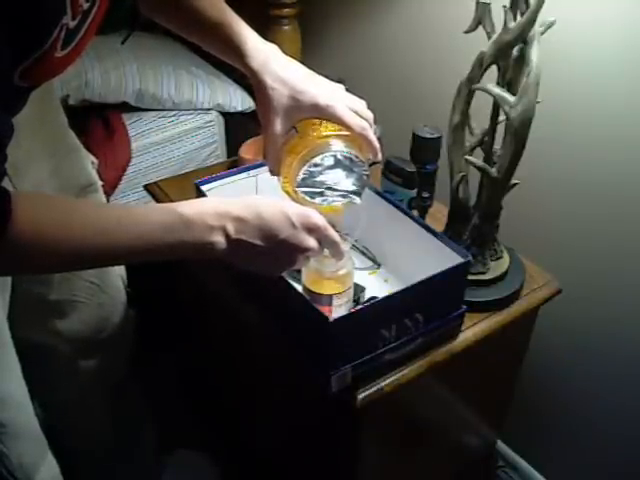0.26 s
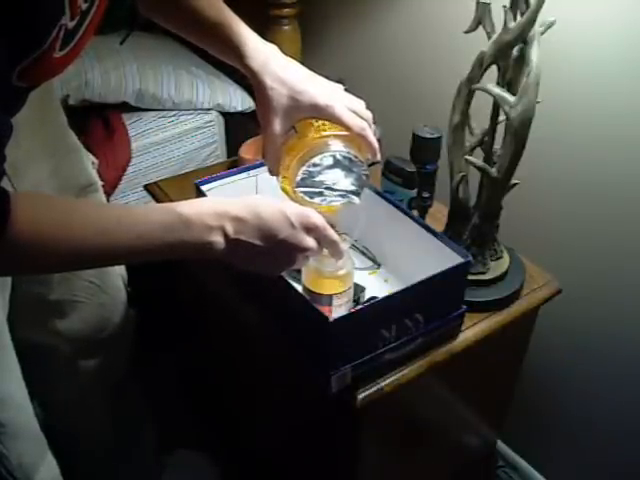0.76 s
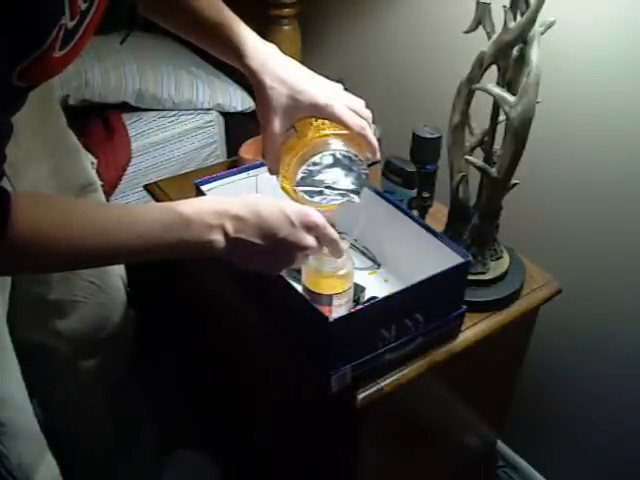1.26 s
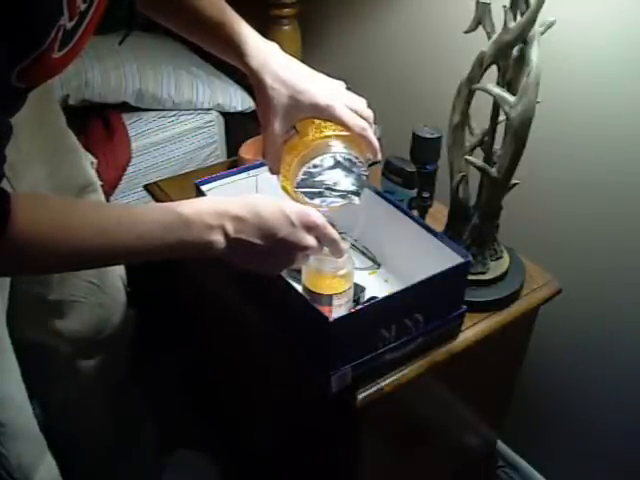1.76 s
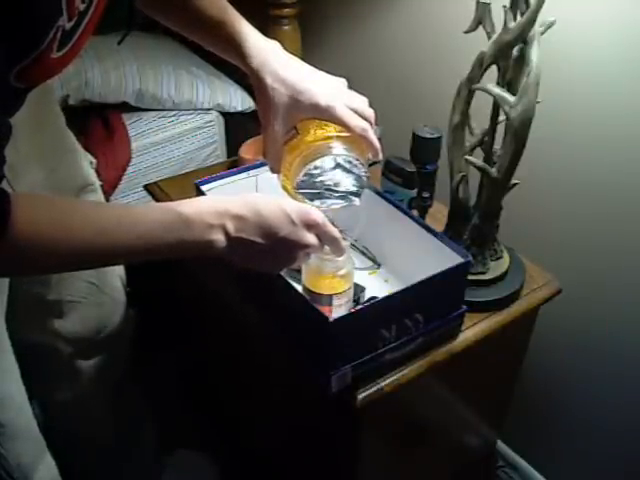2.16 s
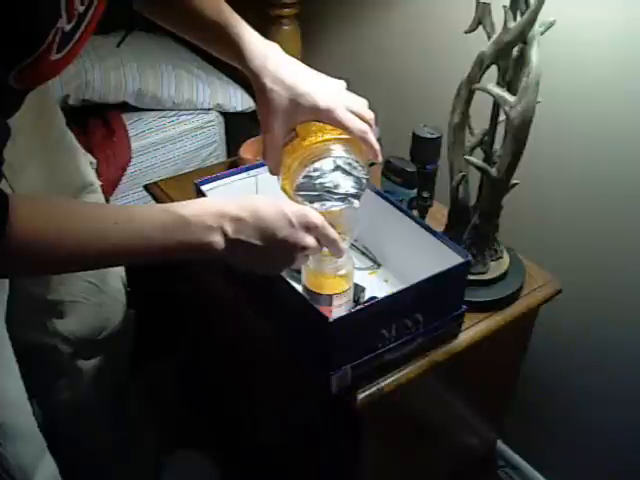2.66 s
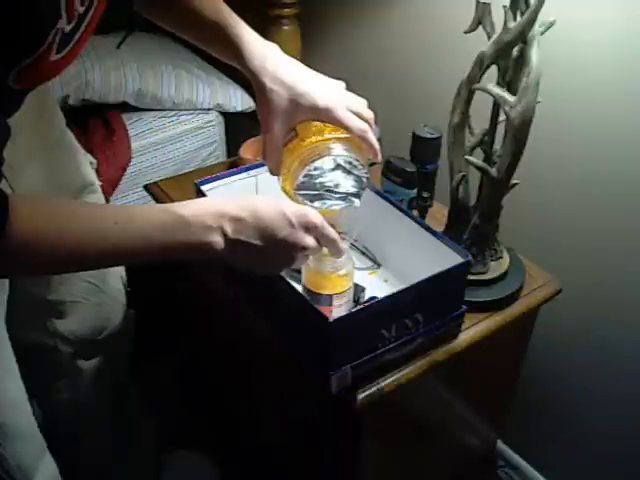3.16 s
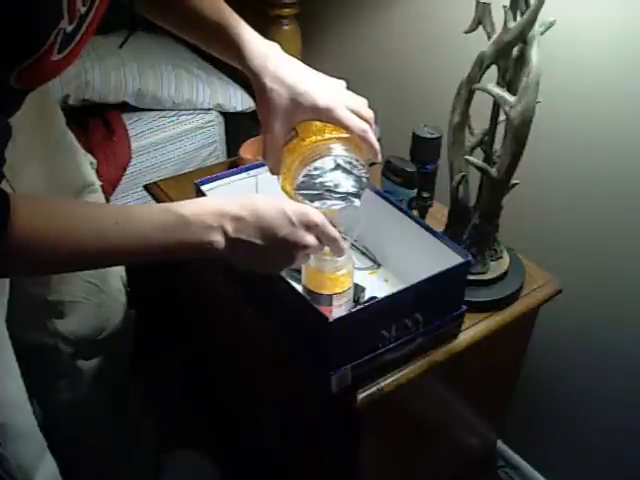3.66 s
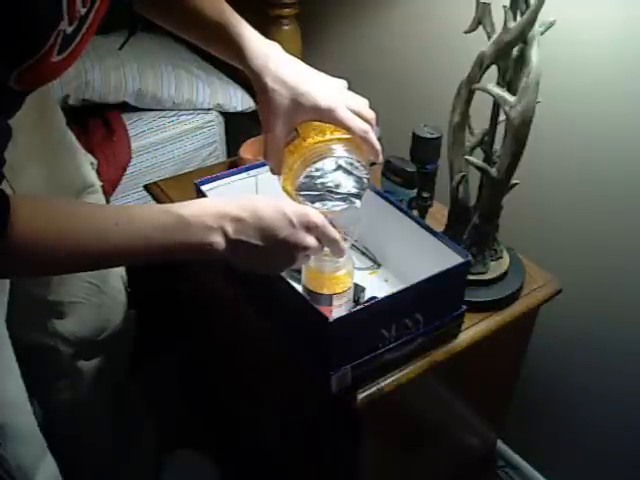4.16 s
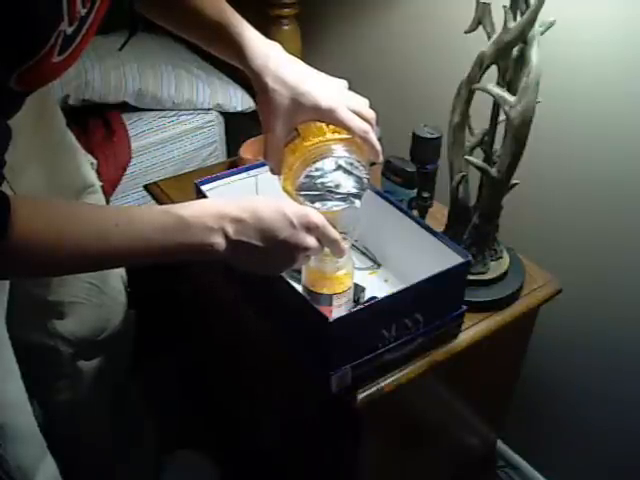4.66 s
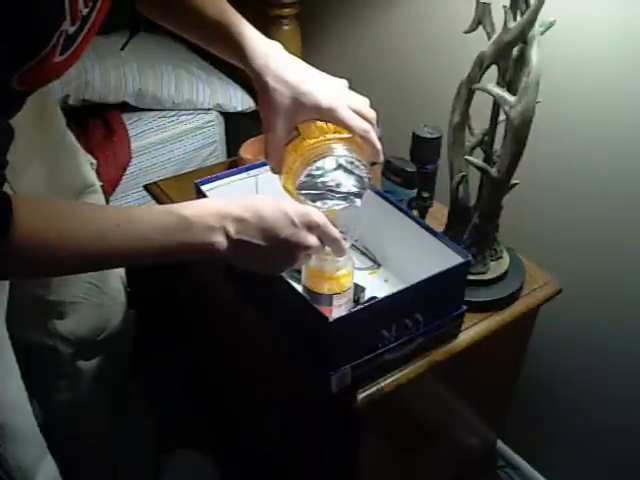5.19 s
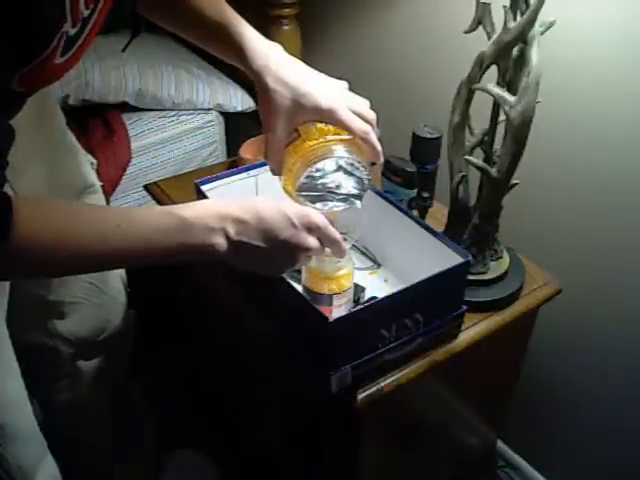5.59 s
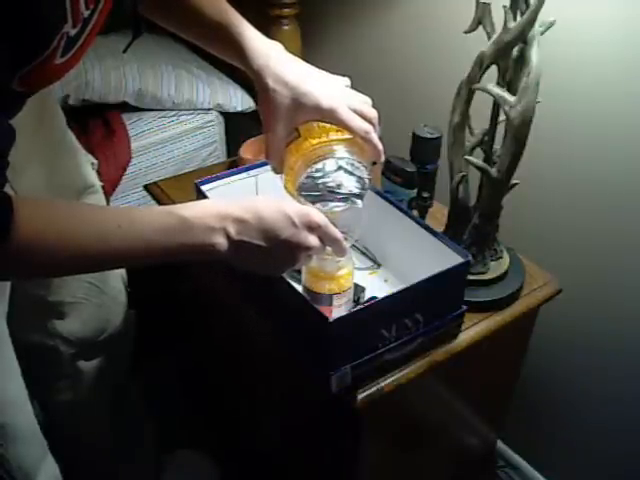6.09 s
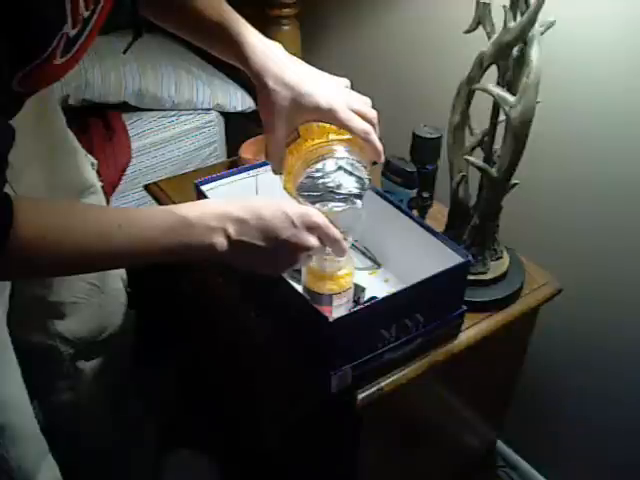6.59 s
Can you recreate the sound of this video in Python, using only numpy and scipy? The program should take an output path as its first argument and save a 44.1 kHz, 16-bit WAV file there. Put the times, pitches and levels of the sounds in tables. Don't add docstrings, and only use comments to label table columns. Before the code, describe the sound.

Small hard plastic pellets pour from a jar through a funnel into a little bottle, making a dense, bright rattle of sharp ticks. After about a second and a half the stream thins to scattered clicks and a soft slide, then floods back loudly and runs unevenly with hard knocks. Quiet, furnished room; cheap pocket camera close by, distorted, thin and gritty.

```python
import sys
import numpy as np
from scipy import signal
from scipy.fft import rfft, irfft
from scipy.io import wavfile
from scipy.ndimage import map_coordinates

SR = 44100
rng = np.random.default_rng(int(sys.argv[2]) if len(sys.argv) > 2 else 0)


def to_wav(s):
    ch = np.atleast_2d(s).T
    pcm = np.round(np.clip(ch, -1, 1) * 32767)
    wavfile.write(sys.argv[1], SR, pcm.astype(np.int16))


def volts_from_decibels(level):
    exponent = np.asarray(level, float) / 20
    return 10 ** exponent


N = 301203

# frequency_hz, bandwidth_hz, level_db
JAR_MODES = [(3280, 150, -2), (3610, 270, -3.5), (2630, 620, -4), (1980, 270, -9.5), (800, 180, -12)]
# start_s, peak_db, bottle_over_funnel_db
TRICKLE_HITS = [(1.6615, -7, -24), (1.685, -7.5, -8), (1.724, -9, -10), (1.7418, -13, -8),
                (1.7643, -17, -22), (1.7931, -2, -11.5), (1.8246, -3.5, -11), (1.8568, -3, -15),
                (1.8637, -7.5, -18), (1.8929, -7, -15), (1.953, -11.5, -10), (1.9817, -14.5, -3.5),
                (2.06, -25, -12), (2.1021, -26, -17), (2.1303, -15.5, -20), (2.1444, -16, -23),
                (2.1635, -16, -19), (2.228, -14, -21), (2.2358, -14, -17), (2.271, -22, -15),
                (2.3196, -9, -21), (2.3287, -3, -15), (2.358, -5, -9.5), (2.376, -13, -16),
                (2.3903, 7.5, -13.5), (2.4223, -19, -19)]
TRICKLE_START_S = TRICKLE_HITS[0][0]
SLIDE_START_S, SLIDE_END_S = 2.03, 2.31


def stream():
    s, size, touch = shower(count=10000, scatter_db=2.5, clump_db=-0.66, clump_hz=60.36)
    rattle = pellets(s, size, -8, touch)
    return volts_from_decibels(flow_db(np.arange(N) / SR)) * rattle / rattle.std()


def knocks():
    s, peak_db, wall_db = knock_rows()
    chance = rng.random((len(s), 5, 21))
    mean_gap_s = [.0002, .0009, .0013, .002, .003]
    delay_s = np.cumsum((.3 + chance[:, :, 0]) * mean_gap_s, axis=1)
    share_db = np.array([-8, -5, -8, -13.5, -15])
    flowing = (s < TRICKLE_START_S) | (s > SLIDE_END_S)
    builds = ((chance[:, 0, 0] < .5) & flowing)[:, None]
    size = volts_from_decibels(peak_db[:, None] + np.where(builds, np.roll(share_db, 2), share_db)).ravel()
    polarity = np.sign(chance[:, :, 1:11] - .5)
    touch = (polarity * (0.48 + 0.85 * chance[:, :, 11:])).reshape(-1, 10)
    s = (s[:, None] + delay_s).ravel()
    in_jar = (s > SLIDE_START_S) & (s < SLIDE_END_S)
    poured = pellets(s, size * ~in_jar, np.repeat(wall_db, 5) + 5, touch)
    return poured + ring(s, size * in_jar, JAR_MODES, touch)


def knock_rows():
    # start_s, peak_db, bottle_over_funnel_db
    first_pour = [(0.0162, -1.5, -8), (0.0951, 7.5, -15), (0.16, 3.5, -18), (0.1805, 2.5, -13),
                  (0.2575, 4, -13), (0.3008, 1, -4.5), (0.331, -7, -18), (0.3504, 2.5, -8.5),
                  (0.3801, 3, -26), (0.4, 4, -25), (0.4659, 2.5, -26), (0.5048, -5, -7), (0.5538, 5.5, -8),
                  (0.5787, -3, -16), (0.6047, 4, -15), (0.6577, 6.5, -10), (0.7226, 1, -14),
                  (0.825, 6, -31), (0.8455, 4.5, -25), (0.9133, 0, -26), (0.9615, 1, -23), (1.05, -1, -20),
                  (1.0885, 6, -17), (1.1766, 6.5, -26), (1.2132, -6, -9), (1.2525, 3.5, -11),
                  (1.3695, -11, -21), (1.3906, 0.5, -15), (1.4212, -8.5, -8), (1.574, -5.5, -17)]
    flood_hits = [(2.4418, -7, -25), (2.467, 1, -12), (2.5127, 5.5, -13), (2.5446, -4.5, -9),
                  (2.5864, 4.5, -11.5), (2.6755, 2, -19), (2.7148, 2, -21), (2.8743, 4, -14),
                  (2.9237, 3.5, -18), (3.0351, 1, -13), (3.0728, -3, -10), (3.1582, 2, -26)]
    uneven_hits = [(3.263, 3, -24), (3.3375, 4, -20), (3.4012, 1.5, -14), (3.432, -1, -11), (3.468, 5, -17),
                   (3.5316, 3.5, -16.5), (3.551, -20, -19), (3.6278, -1.5, -22), (3.6787, 4.5, -17),
                   (3.7178, 4, -17), (3.7912, 2, -26), (3.866, -0.5, -17), (3.9012, -3, -21),
                   (3.9243, 1.5, -19), (3.999, -9, -21), (4.0262, 6.5, -17), (4.0614, 0.5, -33),
                   (4.1801, 3, -32), (4.2953, 5, -19), (4.3406, 4, -15), (4.3927, 1, -9.5),
                   (4.4178, 9, -21), (4.4685, 9, -29), (4.5118, 10, -18), (4.5429, 7, -14),
                   (4.5798, 3, -19), (4.6119, 5, -28), (4.688, -5, -8), (4.7573, 0, -6.5), (4.9077, 2, -22)]
    last_shakes = [(5.1231, 0, -18), (5.3979, 3.5, -29), (5.4171, 2, -19), (5.433, 6, -14.5),
                   (5.4758, 4.5, -12), (5.5372, 3, -25), (5.5675, 1, -18), (5.6266, 0.5, -15),
                   (5.69, 6.5, -22), (5.7357, 2, -19), (5.815, -2, -29), (5.8421, -4, -10),
                   (5.8686, 6, -20), (5.903, -8.5, -23), (5.9177, 3, -15), (5.9528, -2.5, -8.5),
                   (6.0426, 5.5, -14.5), (6.0646, -4, -11), (6.0997, 1, -27), (6.1199, 1.5, -27),
                   (6.202, -12, -10), (6.2258, 8, -15), (6.325, 2, -14), (6.3477, 6.5, -12),
                   (6.3758, -3, -18), (6.4103, 13.5, -23), (6.4434, 3, -12), (6.682, 1, -25),
                   (6.78, 4, -19), (6.8085, 4.5, -16)]
    hard = np.vstack([first_pour, TRICKLE_HITS, flood_hits, uneven_hits, last_shakes])
    hard = hard + [0, 2.5, 0]
    chance = rng.standard_normal((400, 3)).T
    s = np.cumsum(.019 * np.exp(.45 * chance[0]))
    over_flow_db = 14.5 + 2.5 * np.minimum(chance[1], 1.2)
    wall_db = -18 + 6.5 * chance[2]
    rows = np.c_[s, flow_db(s) + over_flow_db, wall_db]
    crowded = np.abs(s[:, None] - hard[:, 0]).min(axis=1) < .012
    paused = (s > TRICKLE_START_S) & (s < SLIDE_END_S)
    rows[crowded | (s > N / SR) | paused, 1] = -99
    return np.vstack([hard, rows]).T


def flow_db(s):
    # time_s, rattle_db
    flow = [(0, -14.5), (.3, -11.5), (.9, -12.5), (1.3, -15.5), (1.7, -24), (1.9, -29.5), (1.93, -45.5),
            (2.3, -36.5), (2.41, -11), (2.75, -9), (3.4, -15), (4.27, -17.5), (4.5, -10.5), (5.04, -15),
            (5.45, -17.5), (5.95, -20), (6.4, -17), (6.83, -11.5)]
    # middle_s, length_s, change_db
    chokes = [(0.449, 0.0083, -12), (0.565, 0.021, -12), (1.002, 0.028, -6.5), (1.22, 0.021, -3.5),
              (1.49, 0.012, -2), (3.508, 0.035, -8), (3.856, .03, -4.5), (4.217, 0.056, -4),
              (5.08, 0.053, -5.5), (5.654, 0.018, -5), (5.79, 0.062, -2), (5.887, .03, -12),
              (5.935, 0.026, -9), (5.981, 0.011, 8), (6.037, .04, -9), (6.179, 0.0091, 9),
              (5.135, 0.035, 6.5), (5.439, 0.0082, 1), (4.118, 0.046, 0), (3.197, 0.093, 2),
              (1.097, 0.013, 2)]
    change_db = sum(db * np.exp(-((s - mid) / length) ** 2 * 2) for mid, length, db in chokes)
    return curve(flow, s) + change_db


def sliding():
    # time_s, level_db
    creep = [
        (1.93, -59),
        (1.96, -23),
        (2.03, -44),
        (2.11, -43),
        (2.14, -28.5),
        (2.21, -29.5),
        (2.24, -23.5),
        (2.34, -21),
        (2.41, -33),
    ]
    s, size, touch = shower(count=20000, scatter_db=2.0, clump_db=2.0, clump_hz=29.6)
    shuffle = ring(s, size, JAR_MODES, touch)
    return volts_from_decibels(curve(creep, np.arange(N) / SR)) * shuffle / shuffle.std()


def pellets(s, size, wall_db, touch):
    # frequency_hz, level_db
    tick_spectrum = [(30, -34), (1200, -12), (1600, -4), (2400, -10), (3200, -27), (3900, 3), (4300, 16),
                     (6000, -59)]
    # frequency_hz, bandwidth_hz, level_db
    funnel_modes = [(3941, 166.6, -1), (3610, 336, -4), (3340, 350, -9)]
    bottle_modes = [(2830, 109, -1.5), (2680, 113, -7.5), (2370, 180, -15), (2070, 84, -13.5),
                    (1593, 93, -18.5), (1489, 89, -14)]
    tick = volts_from_decibels(-6.0) * colour(clicks(s, size * touch[:, 9]), tick_spectrum)
    funnel = ring(s, size, funnel_modes, touch)
    bottle = ring(s, size * volts_from_decibels(wall_db), bottle_modes, touch[:, 3:])
    return tick + funnel + bottle


def ring(s, size, modes, touch):
    out = 0
    for k, (hz, width, db) in enumerate(modes):
        pole = np.exp((2j * np.pi * hz - np.pi * width) / SR)
        hits = clicks(s, size * touch[:, k])
        out = out + volts_from_decibels(db) * signal.lfilter([1], [1, -pole], hits).imag
    return out


def shower(count, scatter_db, clump_db, clump_hz):
    s = rng.random(count) * N / SR
    clump = rng.standard_normal(int(N / SR * clump_hz) + 2)
    clump_at_hit = np.interp(s * clump_hz, np.arange(len(clump)), clump)
    size = volts_from_decibels(scatter_db * rng.exponential(size=count) + clump_db * clump_at_hit)
    return s, size, rng.standard_normal((count, 10))


def clicks(s, size):
    return np.bincount(np.clip((s * SR).astype(int), 0, N - 1), size, N)


def curve(rows, s):
    return np.interp(s, *np.transpose(rows))


def colour(x, points):
    hz, db = np.transpose(points)
    log_hz = np.log(np.linspace(1, SR / 2, 1025))
    cepstrum = irfft(np.interp(log_hz, np.log(hz), db) * np.log(10) / 20)
    cepstrum[1:1024] *= 2
    cepstrum[1025:] = 0
    response = irfft(np.exp(rfft(cepstrum)))[:1024]
    return signal.fftconvolve(x, response)[:N]


def thumps():
    # start_s, peak_db
    jolts = [
        (5.139, -16),
        (5.869, -14),
        (6.466, -16),
    ]
    # frequency_hz, bandwidth_hz, level_db
    tray_modes = [(210, 150, 3), (720, 230, -0.5)]
    s, db = np.transpose(jolts)
    return ring(s, volts_from_decibels(db), tray_modes, np.ones((len(s), 2)))


def room(x, count=10):
    t60_s = .15
    t = np.arange(int(.3 * SR)) / SR
    fade = np.exp(-np.log(1000) * t / t60_s) * (t > .002)
    place = np.arange(N) // 1500 % count
    out = 0
    for k in range(count):
        echoes = fade * rng.standard_normal(len(t))
        out = out + signal.oaconvolve(x * (place == k), echoes)[:N]
    return out / np.linalg.norm(fade)


def hush():
    # frequency_hz, level_db
    hush_spectrum = [(30, -2), (100, -2), (300, -9), (800, -6), (1200, -11), (2700, -3), (4000, -6),
                     (6000, -40)]
    noise = colour(rng.standard_normal(N), hush_spectrum)
    return volts_from_decibels(-49) * noise / noise.std()


def scene():
    near = stream() + sliding() + knocks()
    high_pass = signal.butter(3, 1150, "high", fs=SR, output="sos")
    near = signal.sosfilt(high_pass, near) + volts_from_decibels(-25.5) * near + thumps()
    background = hush()
    return (near + volts_from_decibels(-8) * room(near) + background)[None]


def top_cut(x):
    return signal.sosfilt(signal.butter(12, 15450, fs=SR, output="sos"), x)


def record(dry):
    camera_hz, frame_hz, frame_start_s = 8000, 30.047, .0318
    slip, start_phase = .4233, .02
    t = np.arange(N) / SR
    frame = np.ceil((t - frame_start_s) * frame_hz)
    tick = np.floor(camera_hz * t + start_phase + slip * frame)
    rate = camera_hz + slip * frame_hz
    held = map_coordinates(dry[0], [tick / rate * SR], order=3)
    held = np.clip(held, -0.82, 0.82)
    low_pass = signal.ellip(10, .1, 50, 15400, fs=SR, output="sos")
    smooth = signal.sosfiltfilt(low_pass, held)
    return top_cut(smooth[None])


dry = scene()
out = record(dry)
to_wav(out)
```